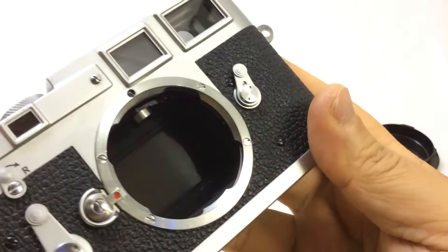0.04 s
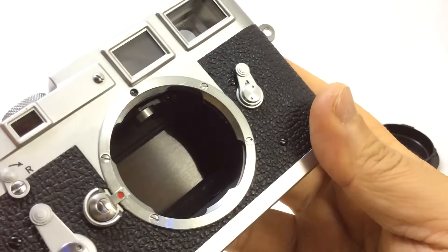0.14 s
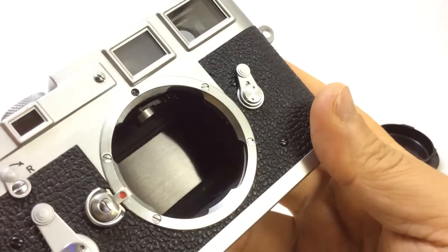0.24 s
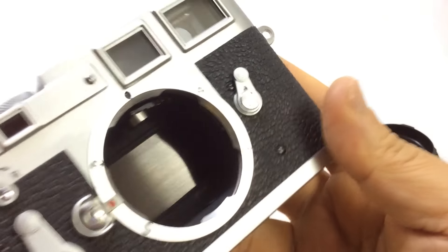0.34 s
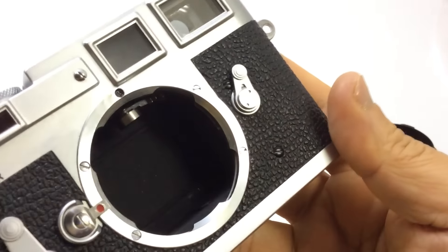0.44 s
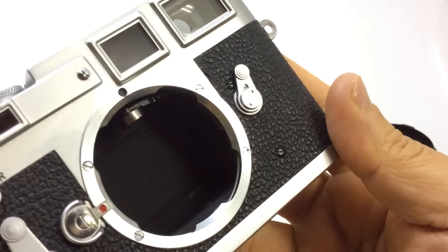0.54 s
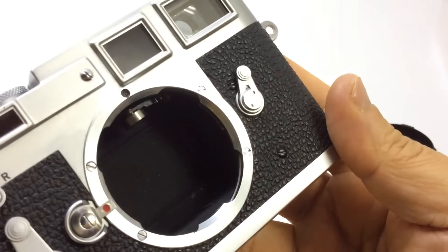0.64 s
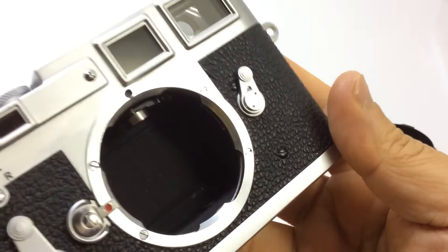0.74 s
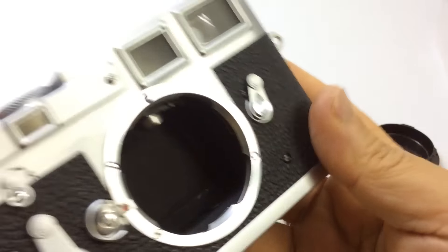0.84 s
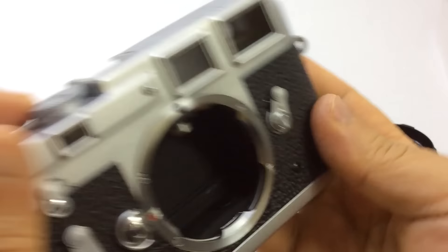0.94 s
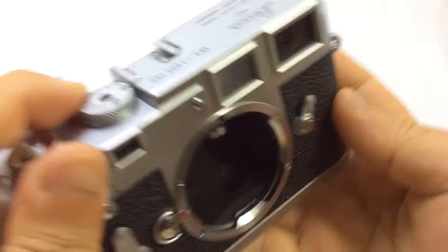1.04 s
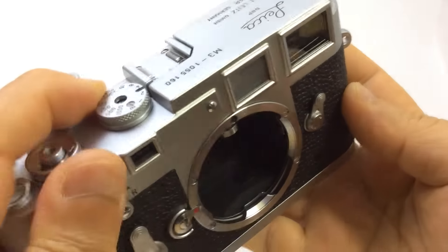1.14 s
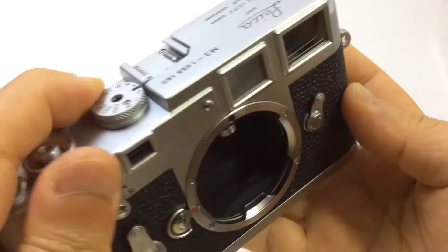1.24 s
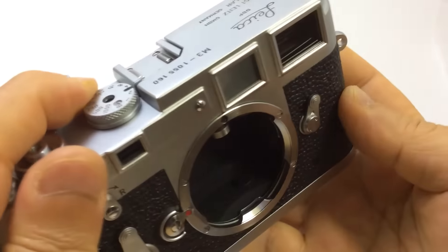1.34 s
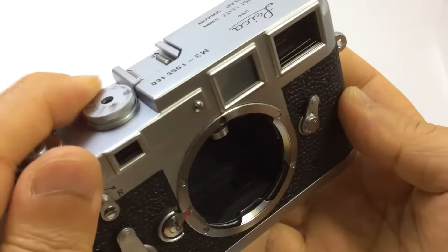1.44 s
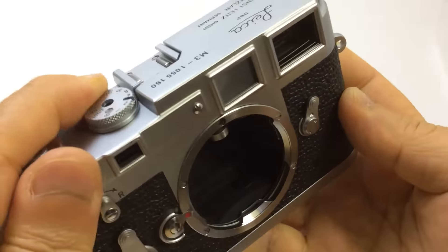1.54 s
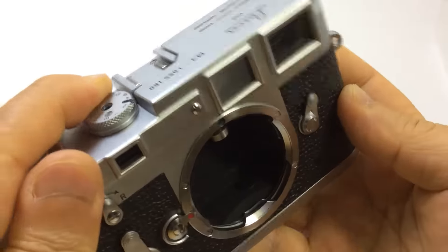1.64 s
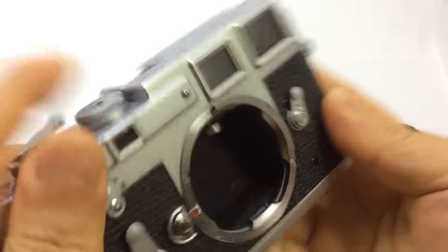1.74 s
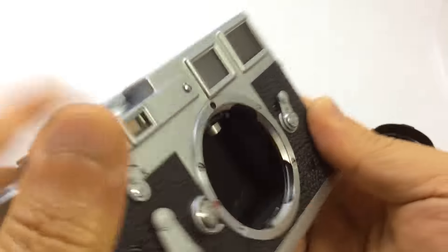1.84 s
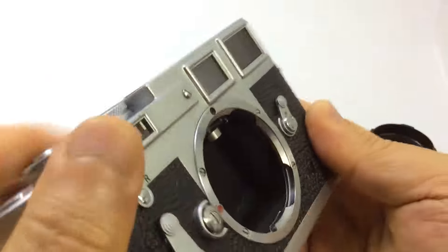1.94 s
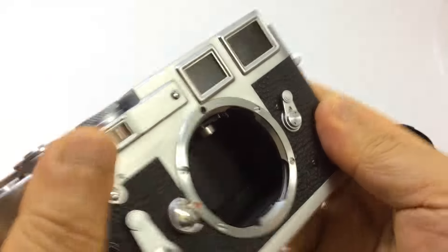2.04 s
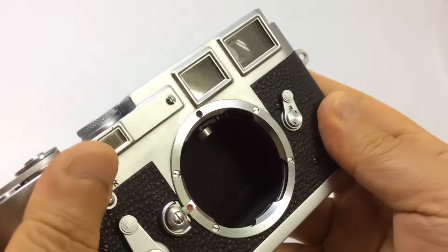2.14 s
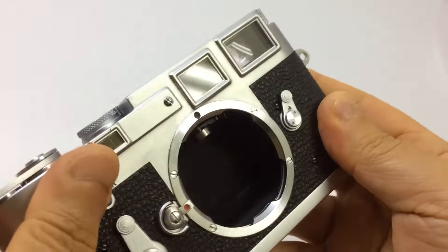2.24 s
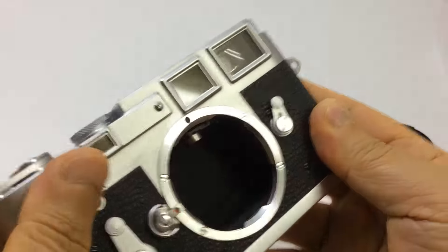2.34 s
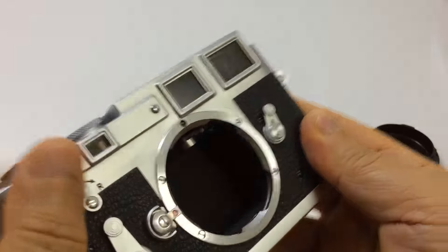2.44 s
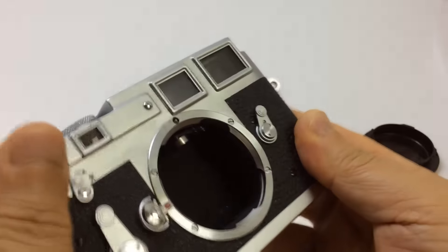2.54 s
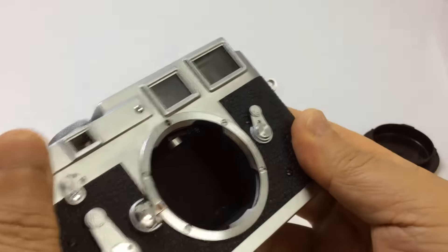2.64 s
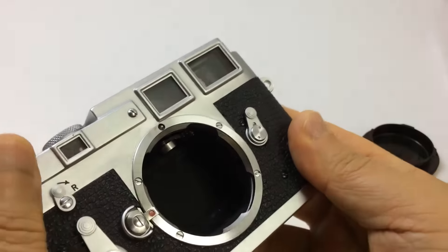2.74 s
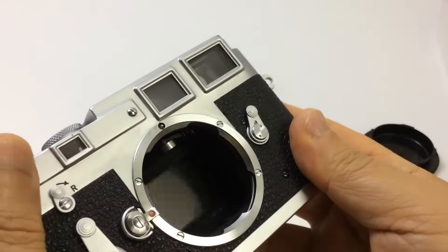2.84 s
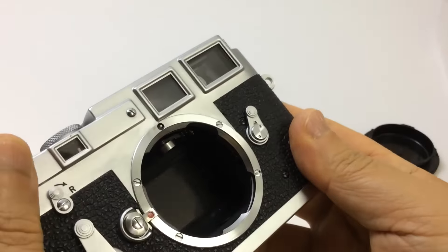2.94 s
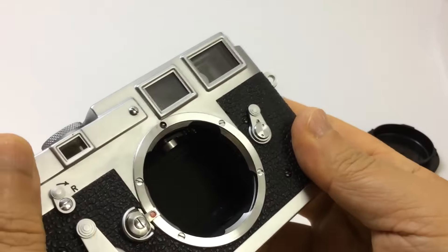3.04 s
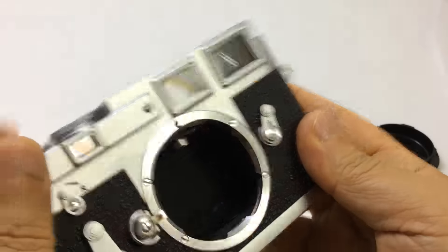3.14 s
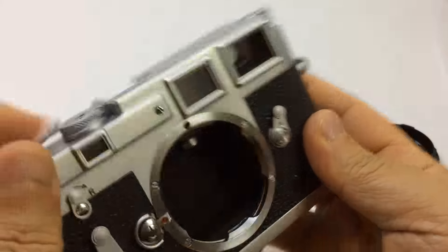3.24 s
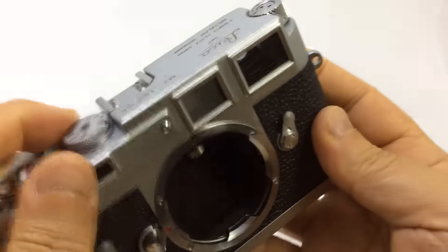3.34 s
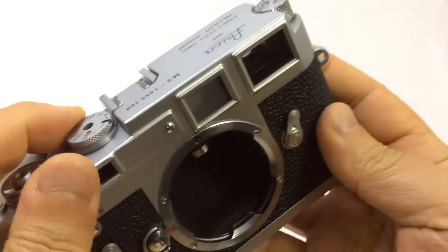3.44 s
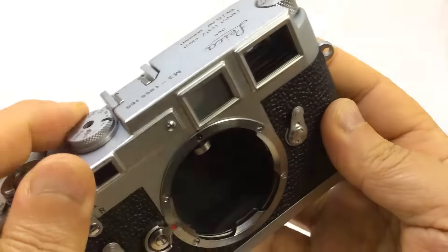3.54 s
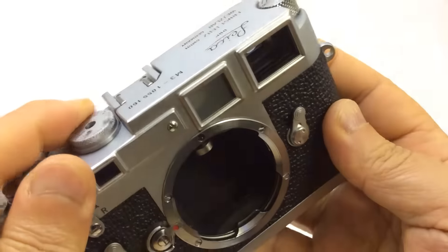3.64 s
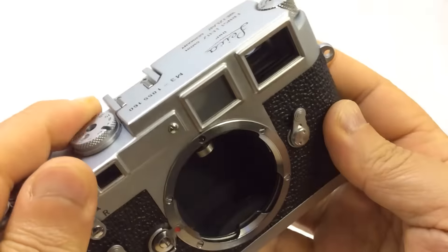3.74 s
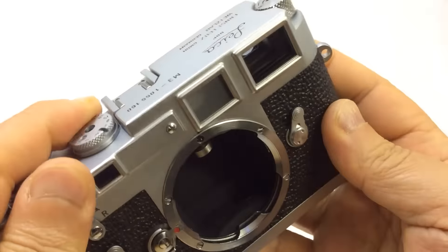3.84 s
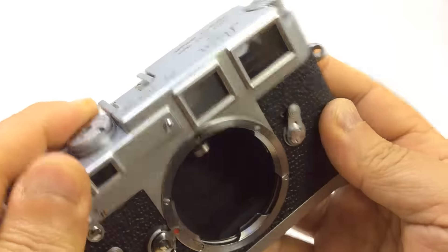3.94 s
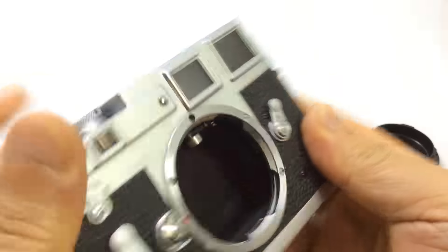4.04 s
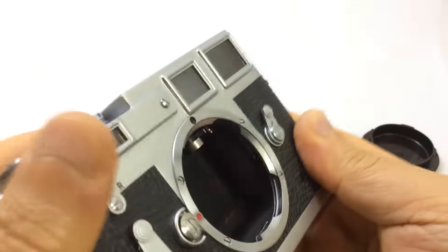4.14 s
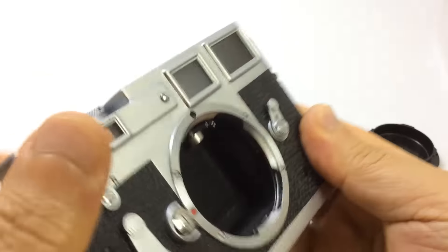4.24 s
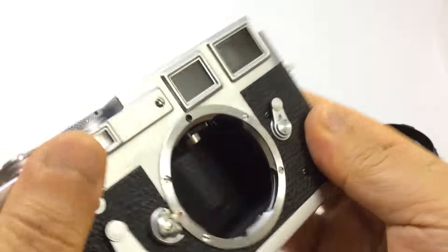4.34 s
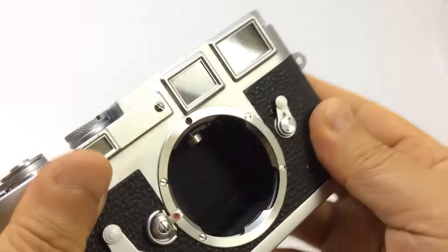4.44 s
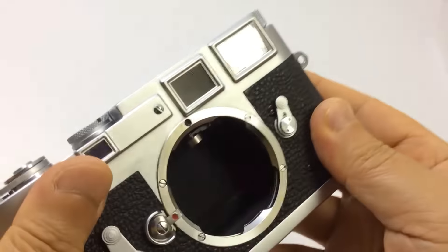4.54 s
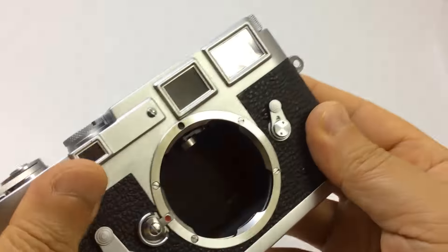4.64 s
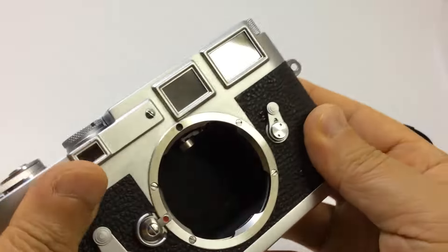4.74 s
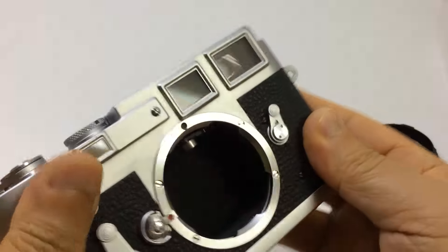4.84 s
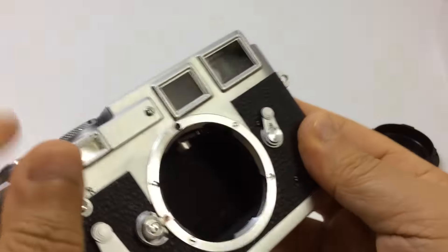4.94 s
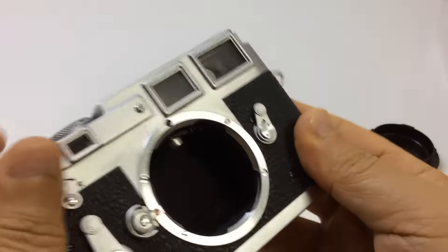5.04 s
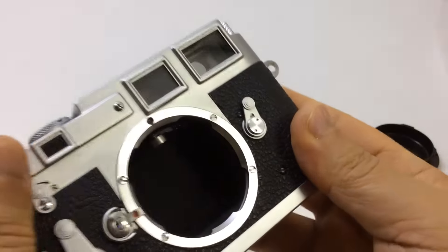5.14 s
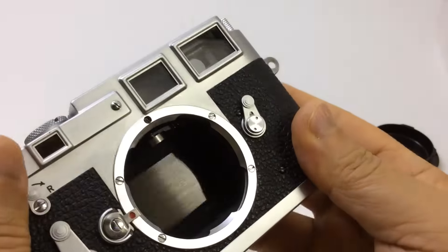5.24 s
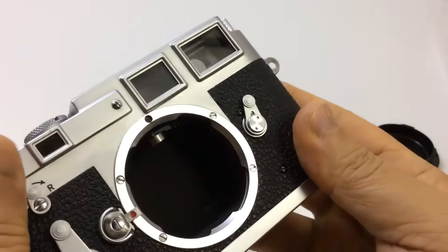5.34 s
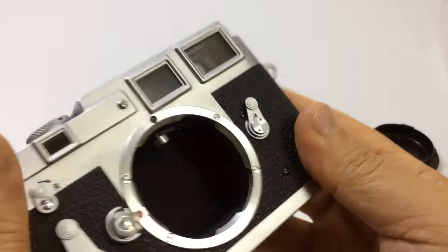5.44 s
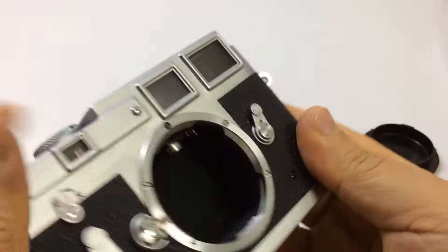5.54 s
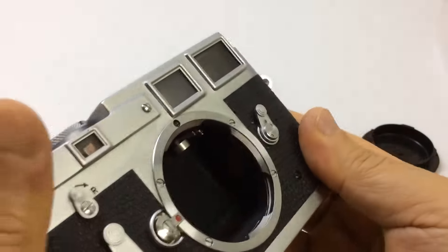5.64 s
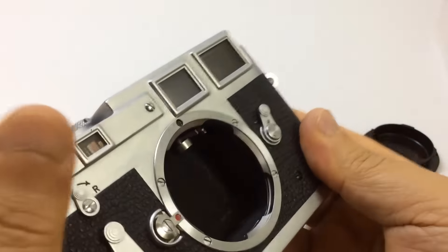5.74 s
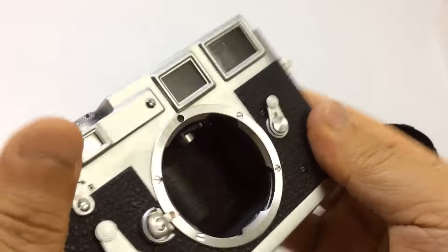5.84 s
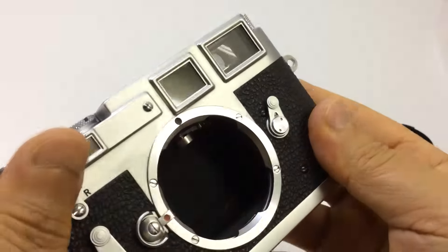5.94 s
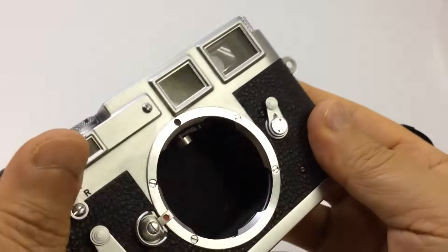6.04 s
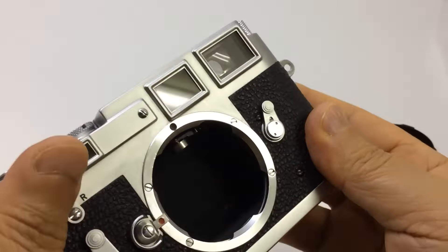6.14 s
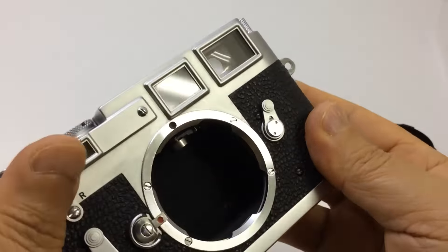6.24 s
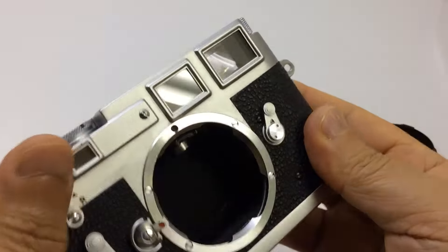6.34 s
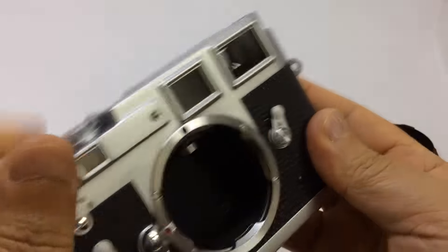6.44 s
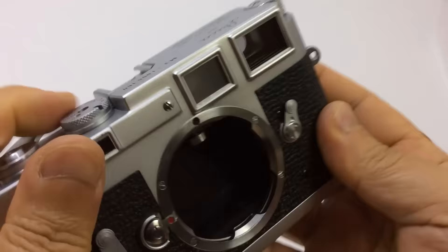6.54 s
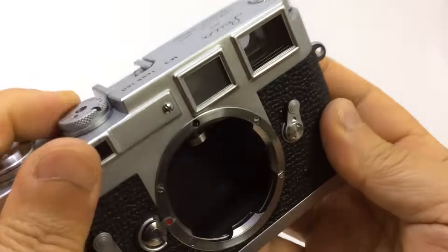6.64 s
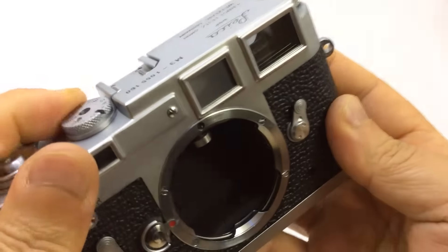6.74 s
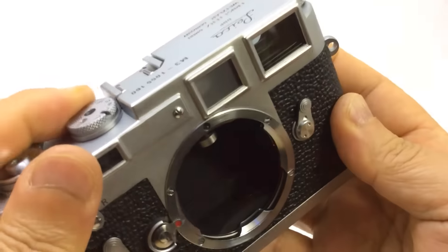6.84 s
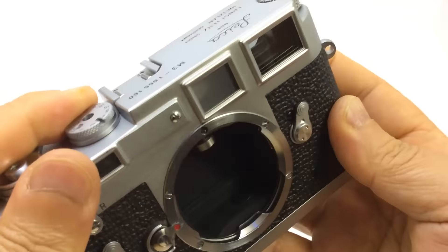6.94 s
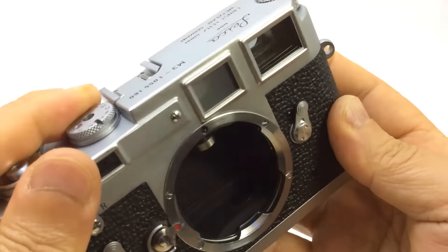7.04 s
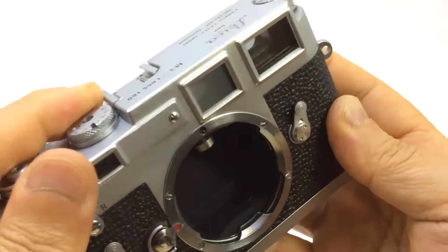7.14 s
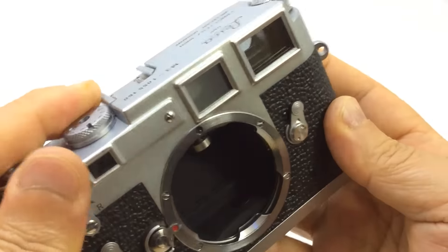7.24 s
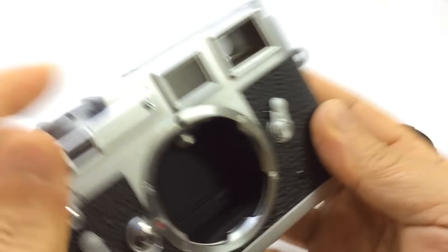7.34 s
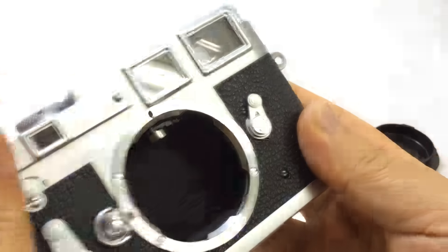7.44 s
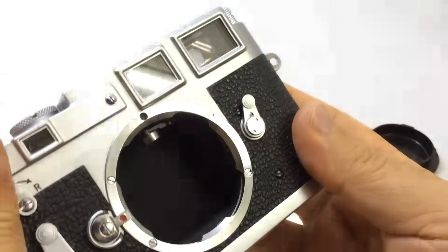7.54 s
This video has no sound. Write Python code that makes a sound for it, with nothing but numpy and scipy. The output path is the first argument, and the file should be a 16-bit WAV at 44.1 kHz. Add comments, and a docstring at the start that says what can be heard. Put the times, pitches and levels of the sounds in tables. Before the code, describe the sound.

A mechanical film camera is fired and wound three times, sharp shutter clicks alternating with ratcheting lever strokes in a quiet room.

```python
"""A mains hum and faint noise fill a small room, where a film camera is fired and wound three times.
At each shot the first cloth curtain of the shutter runs into its brake, a clockwork timer (the
escapement) whirrs, the second curtain slams shut, and the timer runs back, ticking fast.
Fingers rub and knock on the body. Then comes the winding: gears take the load, a small catch (the
pawl) snaps, the shutter latches, and the lever meets its stop, ratchets back and lands home."""
import sys
import numpy as np
from scipy import signal
from scipy.fft import rfft, irfft
from scipy.io import wavfile
from scipy.ndimage import uniform_filter1d, map_coordinates

SR = 44100
rng = np.random.default_rng(int(sys.argv[2]) if len(sys.argv) > 2 else 0)


def materialize(psi):
    """Save the field psi as 16-bit PCM at rate SR to the path in sys.argv[1].

    A 1-D psi becomes a single channel; in a 2-D psi each row is a channel.
    """
    bounded = np.clip(np.atleast_2d(psi).T, -1, 1)
    quanta = np.round(bounded * 32767).astype(np.int16)
    wavfile.write(sys.argv[1], SR, quanta)


N = 334322
TIME = np.arange(N) / SR


def from_db(db):
    """Turn decibels into a gain. Levels in this file are relative: gains and filters follow them."""
    return 10 ** (np.asarray(db) / 20)


def at_hz(points, hz):
    """Read between the rows of a table, with every octave equally wide."""
    known_hz, values = np.transpose(points)
    return np.interp(np.log(np.maximum(hz, 1)), np.log(known_hz), values)


def add(track, start_s, sound):
    """Mix a sound into a track at a given time."""
    start = max(0, round(start_s * SR))
    part = sound[:max(0, N - start)]
    track[start:start + len(part)] += part


def colour(x, tone, size=4096):
    """Give a sound the lows and highs of a tone table, falling away below its first row."""
    hz = np.arange(size // 2 + 1) * SR / size
    gain = from_db(at_hz(tone, hz)) * np.clip((hz + 1) / tone[0][0], 0, 1) ** 2
    cepstrum = irfft(np.log(gain))[:size // 2]  # this way the filter never sounds ahead of a hit
    cepstrum[1:] *= 2
    response = irfft(np.exp(rfft(cepstrum, size)))
    return signal.oaconvolve(x, response / np.linalg.norm(response))[:N]


def resonate(x, peaks):
    """Boost or weaken a sound around each listed pitch."""
    for hz, width_hz, db in peaks:
        w, half, a = 2 * np.pi * hz / SR, np.pi * width_hz / SR, from_db(db / 2)
        feedback = [1 + half / a, -2 * np.cos(w), 1 - half / a]
        x = signal.lfilter([1 + half * a, -2 * np.cos(w), 1 - half * a], feedback, x)
    return x


def drift(per_s):
    """A slow wander: a smooth line through random points."""
    return map_coordinates(rng.standard_normal(400), [TIME * per_s], order=3, mode="mirror")


def ring(clicks, hz, fade_s):
    """Each click starts a pure tone. Here and below, fade_s is the time to die away by 60 dB."""
    r, w = from_db(-60 / (fade_s * SR)), 2 * np.pi * hz / SR
    return signal.lfilter([0, np.sin(w)], [1, -2 * r * np.cos(w), r * r], clicks + 1e-18)


def clatter(fade_s, rise_s=.0012, steady_hz=1300, lump_db=3.4, lump_hz=130):
    """One blow sets countless close pitches ringing in the metal; each blow favours different ones."""
    t = np.arange(SR // 8) / SR
    hz = np.arange(len(t) // 2 + 1) * SR / len(t)
    fade = from_db(-60 * t / fade_s) * (1 - np.exp(-t / rise_s))
    depth_db = lump_db * hz / (hz + steady_hz)  # low pitches answer every blow alike
    lumps = from_db(depth_db * np.interp(hz / lump_hz, np.arange(200), rng.standard_normal(200)))
    burst = rng.standard_normal(len(t)) * fade
    for _ in range(3):  # shape the tone, then the fade, in turn
        spectrum = rfft(burst)
        even = irfft(lumps * spectrum / (np.abs(spectrum) + 1e-12), len(t))
        burst = fade * even / np.sqrt(np.abs(uniform_filter1d(even ** 2, size=128)) + 1e-18)
    return burst


def strike(hits, tone, gain_db, fade_s, modes=(), crack=2.4, crack_after_s=.001):
    """Parts hit each other: a short clatter, a crack at its height, and any pitches that ring on."""
    clicks, bursts = np.zeros(N), np.zeros(N)
    for s, db, *_ in hits:
        add(clicks, s + crack_after_s, from_db([db]))
        add(bursts, s, from_db(db) * clatter(fade_s))
    rings = sum(from_db(db) * ring(clicks, hz, ring_s) for hz, db, ring_s in modes)
    return from_db(gain_db) * (colour(bursts + crack * clicks, tone) + rings)


def motion(spans):
    """The loudness of something that moves for a while, starting and stopping softly."""
    gain = sum(from_db(db) * ((TIME > start) & (TIME < end)) for start, end, db in spans)
    return uniform_filter1d(gain, size=200)


def friction(snags_per_s=700, uneven_db=1.0, fade_s=0.051):
    """Tiny snags of uneven strength, each a short puff, merge into a grainy noise."""
    snags = (rng.random(N) < snags_per_s / SR) * from_db(uneven_db * np.clip(rng.standard_normal(N), -2, 2))
    power = signal.lfilter([1], [1, -from_db(-120 / (fade_s * SR))], snags ** 2 + 1e-18)
    return np.sqrt(power / power.mean()) * rng.standard_normal(N)


# the tones of the hum: pitch_hz, level_db
HUM = [(120, -60), (240, -76.5), (360, -79)]
def mains_hum():
    """Mains electricity hums on a few steady tones."""
    return sum(np.sqrt(2) * from_db(db) * np.sin(2 * np.pi * (hz * TIME + rng.random())) for hz, db in HUM)


# how the room noise rises and falls: time_s, drone_db, air_db
NOISE_LEVELS = [(0, -64.5, -70), (1.0, -57.5, -65), (2.399, -68.5, -65.5), (4.197, -68, -69.5),
                (5.101, -73, -76.5), (7.58, -84.5, -70.5)]
# tone of the airy noise and of the steady noise: pitch_hz, level_db
AIR_TONE = [(200, -3.5), (950, 0), (1500, -4), (2500, -21), (5000, -24)]
FLOOR_TONE = [(15, -52), (25, -23), (66, -12), (122, -8.5), (169, -12.5), (246, -12.5), (469, -27),
              (1340, -36), (3170, -36.5), (6000, -41), (9050, -35), (12500, -47.5), (15500, -61)]
def room_noise(drone_hz=52.4, drone_waver_db=2.5, air_waver_db=0.84):
    """A low wavering drone, soft airy noise that swells a little, and a steady rumble and hiss."""
    times, *columns = np.transpose(NOISE_LEVELS)
    drone_db, air_db = [np.interp(TIME, times, column) for column in columns]
    wave = np.sqrt(2) * np.sin(2 * np.pi * drone_hz * TIME + .5 * drift(9))
    drone = from_db(drone_db - 1 + drone_waver_db * drift(11)) * wave
    air = from_db(air_db - 4 + air_waver_db * drift(8.2)) * colour(rng.standard_normal(N), AIR_TONE)
    return drone + air + from_db(-67) * colour(rng.standard_normal(N), FLOOR_TONE)


# the first curtain is let go and travels to its brake: start_s, level_db, travel_s
OPENING = [(.149, -14, 0.026), (2.868, -15, 0.025), (5.298, -10.5, .021)]
# tone of that click: pitch_hz, level_db
OPENING_TONE = [(120, -55), (200, -23), (392, -22), (690, -3.5), (1300, -3), (1480, -0.5), (3680, -2.5),
                (5110, -11.5), (8350, -7), (15500, -19.5)]
def first_curtain(trip_lead_s=.0019, rebound_s=.0033):
    """The release trips softly; the catch strikes, then strikes again as the curtain leaves it."""
    hits = []
    for s, db, _ in OPENING:
        hits += [(s - trip_lead_s, db - 15), (s, db), (s + rebound_s, db + 1.5)]
    return strike(hits, OPENING_TONE, gain_db=-9, fade_s=.024, crack=3)


CLOTH_SETTLE_S = .0042  # the cloth runs on this long in the brake
# tone of the running cloth and clockwork: pitch_hz, level_db
RUN_TONE = [(600, -14.5), (1000, -12.5), (1650, -9.5), (2650, -7), (4800, -6.5), (8300, -4), (11000, -2),
            (15500, -19)]
# pitches that the timer's metal plate boosts or weakens: pitch_hz, width_hz, boost_db
PLATE = [(2670, 400, 8.5), (3548, 400, 4), (5660, 480, 4)]
def through_plate(x):
    """The running cloth and the clockwork all sound through the timer's plate."""
    return resonate(colour(x, RUN_TONE), PLATE)


def cloth(level_db=-33):
    """The first curtain's cloth rubs along until the brake has stopped it."""
    runs = [(s, s + travel + CLOTH_SETTLE_S, level_db) for s, _, travel in OPENING]
    return through_plate(motion(runs) * friction())


# tone of the brake, the second curtain's catch and the pawl: pitch_hz, level_db
SNAP_TONE = [(290, -52), (500, -20.5), (1270, -20), (2430, -9.5), (5050, -8.5), (7240, -10.5), (7890, -0.5),
             (11300, -6.5), (15500, -23)]
def brake(level_db=-10.5):
    """The first curtain hits its brake at the end of its travel."""
    hits = [(s + travel, level_db) for s, _, travel in OPENING]
    return strike(hits, SNAP_TONE, gain_db=-8, fade_s=.022, crack=3)


# how the curtain's pull changes the plate's ring: pitch_hz, width_hz, boost_db
LOADED_PLATE = [(2500, 400, 5), (4800, 700, -6)]
def timer_whirr():
    """The timer's fine teeth whirr while it holds the second curtain back."""
    waits = [(s + travel + CLOTH_SETTLE_S, shut_s, whirr_db)
             for (s, _, travel), (shut_s, _, whirr_db, _) in zip(OPENING, CLOSING)]
    whirr = motion(waits) * friction(snags_per_s=540, uneven_db=2)
    return through_plate(resonate(whirr, LOADED_PLATE))


# light knocks on the body: start_s, level_db
KNOCKS = [(.293, -33.5), (1.588, -39.5), (1.945, -42.5), (3.241, -42), (3.897, -42), (4.218, -47.5)]
# tone of the body when touched: pitch_hz, level_db
BODY_TONE = [(400, -25), (1200, -1), (2200, -2.5), (4000, -4), (8000, -13.5), (15000, -18)]
def knocks():
    """Fingers and loose parts knock lightly on the body."""
    return strike(KNOCKS, BODY_TONE, gain_db=-5, fade_s=.021)


# the second curtain's slam, the whirr before it and the bounce after: start_s, slam_db, whirr_db, bounce_db
CLOSING = [(0.438, -5, -51.5, -9.5), (3.0263, -5.5, -51, -19.5), (5.398, -5.5, -42.5, -18)]
# tone of the slam: pitch_hz, level_db
CLOSING_TONE = [(88, -56), (150, -33.5), (490, -13), (1270, -12.5), (1630, -2), (2410, -11), (3690, -5.5),
                (4390, -10.5), (6860, -9.5), (10900, -2.5), (12700, -18), (14600, -17.5), (15500, -28)]
# parts that ring on after it: pitch_hz, level_db, fade_s
SLAM_RINGS = [(1675, -40, 0.19), (3650, -34, 0.17), (10700, -31.5, .11)]
def second_curtain(catch_lead_s=.0233, catch_db=-23.5, bounce_s=.004):
    """A catch lets go, and the second curtain slams shut and bounces once."""
    catches = [(s - catch_lead_s, catch_db) for s, *_ in CLOSING]
    bounces = [(s + bounce_s, db) for s, *_, db in CLOSING]
    slams = strike(CLOSING + bounces, CLOSING_TONE, gain_db=-4.5, fade_s=.029, modes=SLAM_RINGS, crack=3)
    return strike(catches, SNAP_TONE, gain_db=-8, fade_s=.056) + slams


# the timer runs back after each shot: start_s, end_s, beats_per_s, level_db
RUN_BACK = [(0.546, 1.119, 100, -46.5), (3.133, 3.39, 80, -48), (5.451, 5.588, 190, -32.5)]
def timer_run_back(offbeat_db=-4, offbeat_early=.25, jitter_s=.0001, uneven_db=1.5):
    """The wheels whirr while a rocking arm beats on them; every second beat is softer and early."""
    beats = np.zeros(N)
    for start, end, per_s, db in RUN_BACK:
        for k, (late, strength) in enumerate(rng.standard_normal((56, 2))):
            offbeat = k % 2
            s = start + (k - offbeat_early * offbeat) / per_s + jitter_s * late
            beat = from_db(db - 8 + offbeat_db * offbeat + uneven_db * strength) * clatter(fade_s=.024)
            if s < end:
                add(beats, s, beat)
    wheels = motion([(start, end, db - 23) for start, end, _, db in RUN_BACK]) * friction()
    return through_plate(wheels + beats)


# fingers slide on the body: start_s, end_s, level_db
RUBS = [(1.155, 1.205, -67), (1.51, 1.55, -65.5), (3.72, 3.755, -64), (1.80, 1.87, -70), (5.70, 5.77, -61),
        (7.39, 7.47, -67)]
def finger_rubs():
    """Skin slides softly over the body, swelling and fading."""
    return colour(uniform_filter1d(motion(RUBS), size=1200) * friction(), BODY_TONE)


# gears take the load, just after a click of slack: start_s, level_db, slack_lead_s, slack_db, grit_db
GEARS = [(2.048, -24, 0.015, -27, -52), (4.325, -21, .0115, -18.5, -55.5), (5.7998, -23.5, 0.01, -26, -54)]
# single gear teeth knock, on the stroke or the return: start_s, level_db
TEETH = [(2.0202, -37), (2.0695, -32), (4.2775, -43.5), (4.3017, -37.5), (4.3444, -41), (4.3674, -42),
         (4.5037, -45), (4.5553, -42.5), (5.82, -31), (5.8402, -38), (6.0325, -40), (6.4281, -40.5),
         (6.4397, -41.5), (6.4716, -40.5), (6.4815, -45.5)]
# tone of the slack's click, the knocking teeth and the turning gears: pitch_hz, level_db
SLACK_TONE = [(1650, -11), (3270, -3), (5010, 0), (8490, -4), (15500, -32)]
GEAR_TONE = [(400, -33), (694, -4.5), (957, -10), (2630, -5.5), (3010, 2), (4160, -6.5), (8800, -5.5),
             (15500, -19)]
GRIT_TONE = [(400, -14), (700, 0), (1000, -6), (3500, 1.5), (5500, -10.5), (9500, -6), (15500, -22)]
def gears(run_s=.242, fade_db_per_s=33):
    """The slack closes with a click, teeth knock, and the turning gears make a grit that quietens."""
    slack_hits = [(s - lead, db) for s, _, lead, db, _ in GEARS]
    slack = strike(slack_hits, SLACK_TONE, gain_db=-11.5, fade_s=.034)
    teeth = strike(GEARS + TEETH, GEAR_TONE, gain_db=-5, fade_s=.036)
    runs = [(s, s + run_s, db - fade_db_per_s * np.clip(TIME - s, 0, run_s)) for s, *_, db in GEARS]
    grit = motion(runs) * friction(snags_per_s=170, uneven_db=2.5, fade_s=.045)
    return slack + teeth + colour(grit, GRIT_TONE)


# snaps of the pawl: start_s, level_db
PAWLS = [(2.1424, -20.5), (4.434, -20), (5.901, -21.5)]
def pawl():
    """A small catch snaps partway through each winding stroke."""
    return strike(PAWLS, SNAP_TONE, gain_db=-8, fade_s=.056)


# dull tocks: start_s, level_db
TOCKS = [(2.261, -36.5), (4.5745, -43), (6.049, -38.5)]
# their tone: pitch_hz, level_db
TOCK_TONE = [(874, -12), (1700, 3.5), (2570, -10), (12000, -24)]
def tocks():
    """A dull tock sounds near the end of each stroke."""
    return strike(TOCKS, TOCK_TONE, gain_db=-3, fade_s=.022)


# the stroke's stop, and the latch and its first touch just before: start_s, stop_db, latch_db, touch_db
STOPS = [(2.306, -10.5, -25.5, -26), (4.684, -10, -18.5, -41), (6.206, -9.5, -18.5, -36)]
# tone of the latch and of the stop: pitch_hz, level_db
LATCH_TONE = [(250, -43.5), (669, -19), (1200, -17.5), (2160, -2), (2800, -18.5), (3330, -13),
              (4240, -16.5), (8920, -12), (15500, -27)]
STOP_TONE = [(200, -53), (371, -11.5), (554, -15), (702, -1), (874, -10), (1030, -7.5), (1950, -4.5),
             (6130, -6), (9480, -2), (15500, -16.5)]
# parts that ring on after the stop: pitch_hz, level_db, fade_s
STOP_RINGS = [(691, -33, 0.11), (1880, -47, 0.36), (3350, -20, 0.089), (3930, -27, 0.17), (8000, -32, 0.1),
              (9500, -28.5, 0.16)]
def latch_and_stop(latch_lead_s=.016, touch_lead_s=.0027):
    """The shutter's latch touches and clicks in, then the winding hits its stop."""
    hits = []
    for s, _, latch_db, touch_db in STOPS:
        hits += [(s - latch_lead_s - touch_lead_s, touch_db), (s - latch_lead_s, latch_db)]
    latches = strike(hits, LATCH_TONE, gain_db=-2.5, fade_s=.033, crack=6.6)
    return latches + strike(STOPS, STOP_TONE, gain_db=-6.5, fade_s=.04, modes=STOP_RINGS)


# the lever swings back and lands: home_s, home_db, swing_s, teeth_db
LEVER = [(2.5651, -17.5, .109, -39.5), (4.999, -17, 0.11, -39), (6.546, -21.5, 0.16, -44.5)]
# tone of the landing: pitch_hz, level_db
LEVER_TONE = [(450, -37), (661, -18), (863, -23.5), (1470, -7.5), (1730, -19), (2550, -0.5), (3230, -9),
              (3690, -0.5), (4400, -10), (9230, -13.5), (15500, -24)]
# parts that ring on after it: pitch_hz, level_db, fade_s
LEVER_RINGS = [(3740, -44, .12), (3935, -45, .13)]
def lever_return(tooth_gap_s=.016, jitter_s=.002, uneven_db=1.5, graze_lead_s=.0055):
    """The lever springs back, drags its pawl over uneven teeth, grazes its seat and lands home."""
    hits = []
    for home_s, home_db, swing_s, teeth_db in LEVER:
        for k, (late, strength) in enumerate(rng.standard_normal((24, 2))):
            gone_s = k * tooth_gap_s
            if gone_s < swing_s - graze_lead_s:
                s = home_s - swing_s + gone_s + jitter_s * late
                swell_db = np.sin(np.pi * gone_s / swing_s) - 1  # loudest in mid swing
                hits.append((s, teeth_db + swell_db + uneven_db * strength))
        hits.append((home_s - graze_lead_s, home_db - 17.5))
    ratchet = strike(hits, GEAR_TONE, gain_db=-8, fade_s=.042)
    return ratchet + strike(LEVER, LEVER_TONE, gain_db=-5, fade_s=.032, modes=LEVER_RINGS)


# the room's echo: pitch_hz, fade_s, level_db
ROOM = [(300, 0.31, -9.5), (2500, 0.3, -11), (9500, 0.23, -10), (15280, 0.36, -12.5)]
def room_echo(x, first_echo_s=.0023, scatter_db=-13, scatter_fade_s=.07):
    """Sound scatters quickly off hands and bench; the room's echo dies at its own pace in each band."""
    t, tail = TIME[:SR // 2], 0
    edges = np.geomspace(150, 17000, 11)
    for low, high in zip(edges, edges[1:]):
        fade_s, echo_db = [at_hz([(row[0], row[k]) for row in ROOM], np.sqrt(low * high)) for k in (1, 2)]
        late, near = [from_db(-60 * t / s) * (t > first_echo_s) for s in (fade_s, scatter_fade_s)]
        fade = np.hypot(from_db(echo_db) * late / np.linalg.norm(late),
                        from_db(scatter_db) * near / np.linalg.norm(near))
        band = signal.butter(2, [low, high], "band", fs=SR, output="sos")
        tail = tail + signal.sosfilt(band, fade * rng.standard_normal(len(t)))
    return signal.oaconvolve(x, tail)[:N]


# pitches that the camera's metal shell boosts or weakens: pitch_hz, width_hz, boost_db
SHELL = [(708.3, 130, 4.5), (879, 130, -13), (1043, 67, 3), (1240, 92, -4), (1686, 170, 1.5),
         (2170, 75, 2.5), (2840, 260, -4.5), (3830, 710, 3.5), (4160, 200, -3), (8030, 90, 1.5)]
def scene():
    """Every part of the camera sounds through the same metal shell, into the room."""
    background = mains_hum() + room_noise()
    shots = first_curtain() + cloth() + brake() + timer_whirr() + second_curtain() + timer_run_back()
    handling = knocks() + finger_rubs()
    winding = gears() + pawl() + tocks() + latch_and_stop() + lever_return()
    camera = resonate(shots + handling + winding, SHELL)
    return (background + camera + room_echo(camera))[None]


def record(dry):
    """The highest treble, above 15600 Hz, is cut steeply."""
    return signal.sosfilt(signal.ellip(10, .2, 80, 15600, fs=SR, output="sos"), dry)


dry = scene()
out = record(dry)
materialize(out)
```